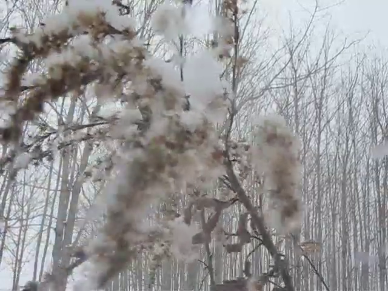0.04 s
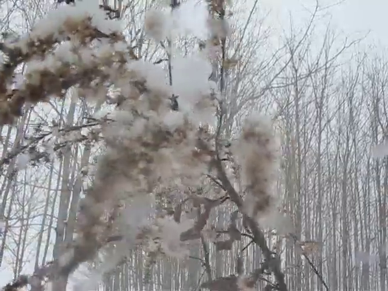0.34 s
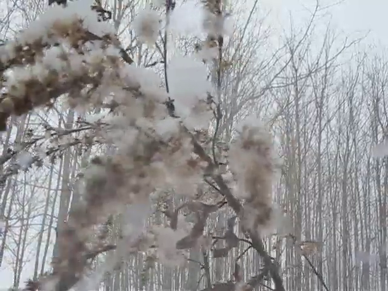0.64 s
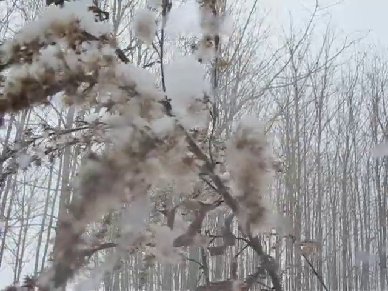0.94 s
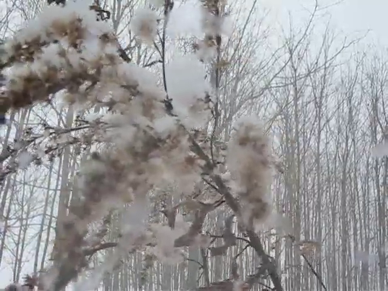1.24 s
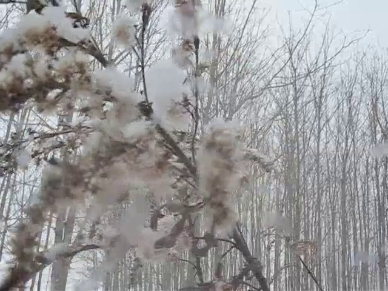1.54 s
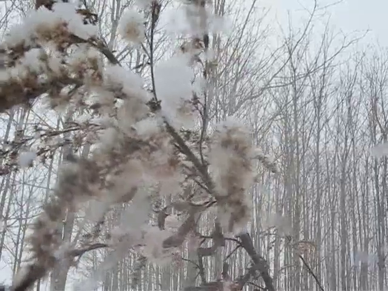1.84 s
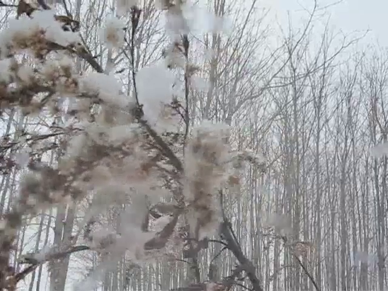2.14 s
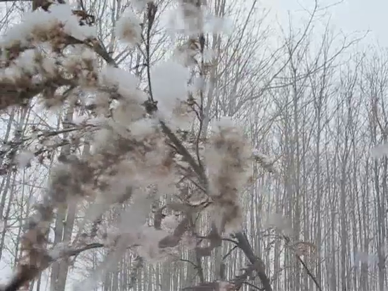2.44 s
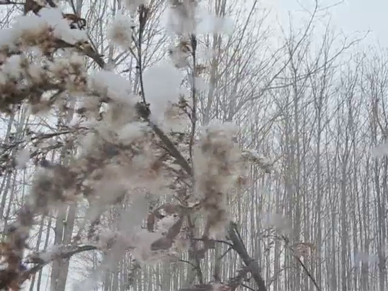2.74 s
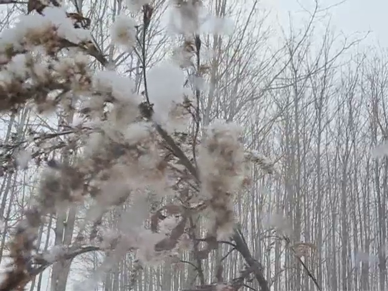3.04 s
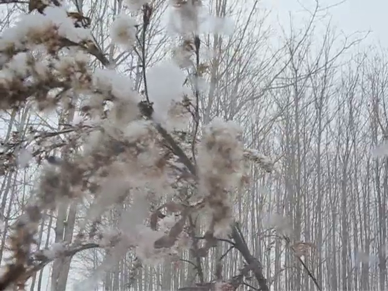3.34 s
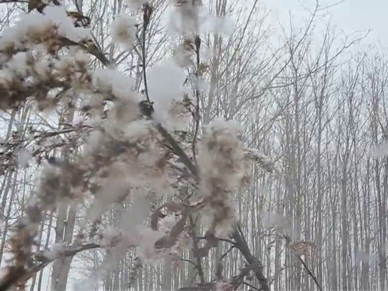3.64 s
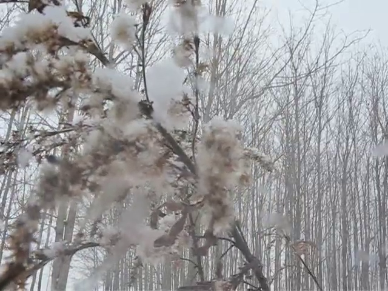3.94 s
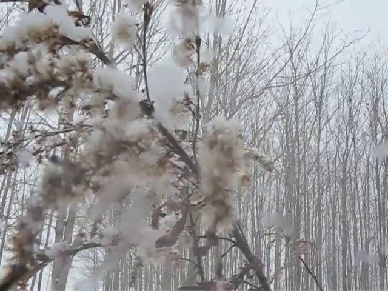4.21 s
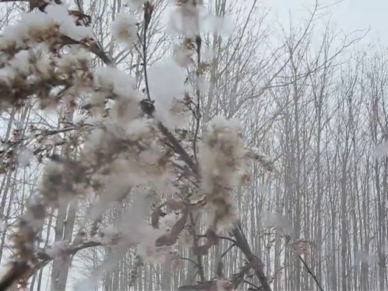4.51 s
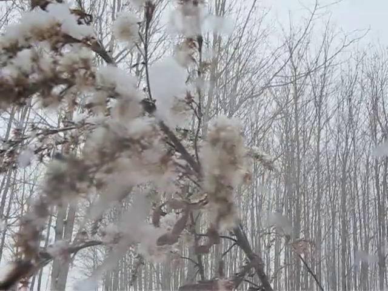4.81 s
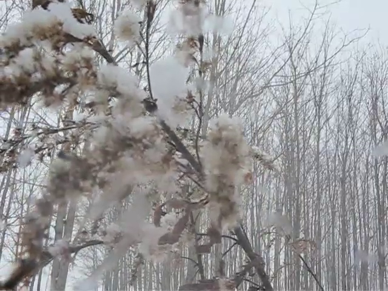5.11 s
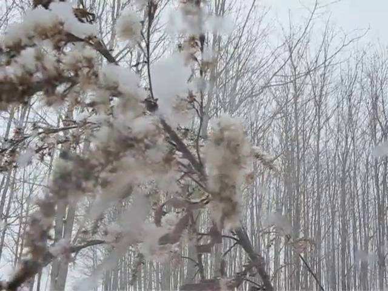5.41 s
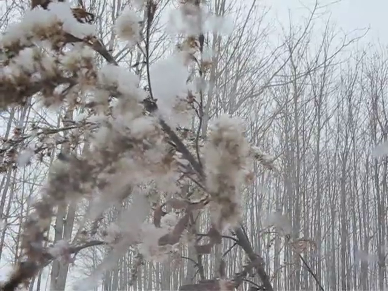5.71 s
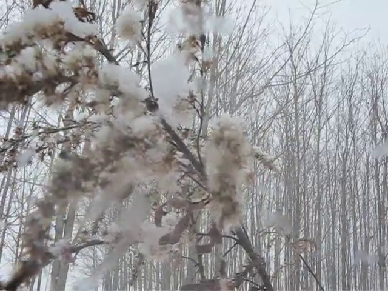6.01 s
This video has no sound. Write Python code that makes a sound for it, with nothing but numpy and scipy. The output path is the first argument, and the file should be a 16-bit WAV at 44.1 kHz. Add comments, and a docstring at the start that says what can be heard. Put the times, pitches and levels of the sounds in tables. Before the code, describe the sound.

Sleet patters steadily on twigs in a winter wood, with sharp little clicks, dull taps and faint air in the trees.

```python
"""Icy snow pellets fall on dry, snow-laden weeds at the edge of a bare wood.
Near pellets click on twigs among duller knocks, each blow ringing a few damped resonances;
countless far ones merge into a fine crackling hiss. Soft lumps of snow land and grains trickle down.
Air rushes softly in the trees, and one puff of wind buffets the microphone."""
import sys
import numpy as np
from scipy import signal
from scipy.fft import rfft, irfft, next_fast_len
from scipy.io import wavfile
from scipy.ndimage import map_coordinates

SR = 44100
rng = np.random.default_rng(int(sys.argv[2]) if len(sys.argv) > 2 else 0)


def generate_wav(sig):
    """Save sig (samples, or channels by samples) to the path in sys.argv[1] as 16-bit PCM at SR."""
    pcm = np.round(np.clip(np.atleast_2d(sig).T, -1, 1) * 32767).astype(np.int16)
    wavfile.write(sys.argv[1], SR, pcm)


N = 271656
TICK_SAMPLES, TICK_S, TICK_HZ = 512, .003, 8610  # one blow: buffer, nominal length, typical pitch
LEAD_IN_S = .002  # a faint lead-in softens each click's attack

# tone colour of the pellets' patter: (frequency [Hz], level [dB])
PATTER = [(1470, -33), (2500, -9), (3110, -7.5), (3630, -7), (4110, -4.5), (5150, -5.5), (7250, -1.5),
          (7890, 0.5), (8870, 3.5), (10900, -9.5), (15200, -25), (16000, -27)]


def amp(db):
    """Decibels to gain."""
    return 10 ** (np.asarray(db) / 20)


def unit(x):
    """Each row at rms 1."""
    return x / np.sqrt(np.mean(x ** 2, axis=-1, keepdims=True) + 1e-20)


def wobble(rate):
    """A smooth random curve, rate knots a second."""
    return map_coordinates(rng.standard_normal(int(N * rate / SR) + 4), [np.arange(N) * rate / SR])


def filtered(x, response):
    """x through a frequency response."""
    size = next_fast_len(N + 8192)
    return irfft(rfft(x, size) * response(np.fft.rfftfreq(size, 1 / SR)), size)[:N]


def coloured(x, spectrum):
    """x through an EQ curve of (frequency [Hz], level [dB]) points on a log axis."""
    points_hz, db = np.transpose(spectrum)
    return filtered(x, lambda hz: amp(np.interp(np.log(hz + 1), np.log(points_hz + 1), db)))


def placed(times, sounds):
    """Short sounds, one a row, summed at their start times."""
    at = np.round(np.maximum(times, 0) * SR).astype(int)[:, None] + np.arange(sounds.shape[1])
    return np.bincount(at.ravel(), sounds.ravel(), N)[:N]


def trees(level_db):
    """The even rush of air in the wood."""
    # tone colour of the air: (frequency [Hz], level [dB])
    rush = [(20, -9), (45, -1.5), (70, -1), (100, -1.5), (135, -1.5), (180, -1), (350, -0.5), (700, -0.5),
            (1500, -2), (3000, -6), (5000, -10), (9000, -7), (15000, -23)]
    return unit(coloured(rng.standard_normal(N), rush)) * amp(level_db + 0.45 * wobble(4.69))


def puff(level_db, swell_db, eddy_db, middle_s=0.88, half_width_s=0.49, eddy_s=.02):
    """Passing wind rumbles on the microphone; each eddy swells the rumble and swings the pressure once."""
    # tone colour of the rumble: (frequency [Hz], level [dB])
    buffet = [(15, -5), (35, 3.5), (75, -2.5), (140, -8), (220, -15.5), (400, -29), (1000, -58),
              (3000, -120)]
    # eddies in the puff: (time [s], level [dB], pitch [Hz])
    eddies = [(.37, -48, 50), (.499, -43, 70), (.536, -38, 72), (.685, -36.5, 105), (.708, -37.5, 189),
              (0.785, -37.5, 85), (.803, -32.5, 150), (.832, -38, 330), (1.085, -49, 80), (1.16, -40, 129),
              (1.217, -42.5, 70)]
    times, db, hz = np.transpose(eddies)
    t = np.arange(N) / SR
    passing = amp(level_db) * np.exp(-((t - middle_s) / half_width_s) ** 2)
    swells = amp(db + swell_db) @ np.exp(-((t - times[:, None]) / eddy_s) ** 2)
    rumble = unit(coloured(rng.standard_normal(N), buffet)) * (passing + swells)
    half = SR // 20
    cycles = hz[:, None] * np.arange(-half, half) / SR
    swing = np.cos(2 * np.pi * (cycles + rng.random((len(times), 1)))) * np.exp(-cycles ** 2 / 0.52)
    return rumble + placed(times - half / SR, amp(db + eddy_db)[:, None] * swing)


def crackle(spread_db, count, decay_s=0.00019):
    """Tiny damped rings of random pitch at random times, at rms 1."""
    when, pitch, size = rng.random((count, 3)).T
    t = np.arange(64) / SR
    hz = 2000 + 13000 * pitch
    rings = np.sin(2 * np.pi * hz[:, None] * t) * np.exp(-t / decay_s)
    grains = amp(spread_db * size ** 3)[:, None] * rings
    return unit(coloured(placed(when * N / SR, grains), PATTER))


def far_pellets(hiss_db, grain_db):
    """Distant impacts: a dense crackle over the hiss that the farthest merge into."""
    # strength of the fall: (time [s], level [dB])
    shower = [(0, -50.5), (.41, -51.5), (.68, -49), (1.23, -46.5), (2.93, -51.5), (3.31, -47.5),
              (4.4, -49.5), (6.16, -49)]
    grains = amp(grain_db) * crackle(spread_db=24.5, count=9000)
    hiss = amp(hiss_db) * unit(coloured(rng.standard_normal(N), PATTER))
    fall_db = np.interp(np.arange(N) / SR, *np.transpose(shower))
    return (grains + hiss) * amp(fall_db + 0.91 * wobble(12))


def trickle(level_db, rise_s=.005, fall_s=0.011):
    """Loose grains rattle down through the weeds; each spill starts fast and dies away."""
    # pinches of snow breaking up: (time [s], level [dB])
    spills = [(4.535, -38.5), (4.582, -37), (4.62, -52), (4.655, -48), (4.715, -41)]
    times, db = np.transpose(spills)
    age = np.arange(N) / SR - times[:, None]
    flow = amp(db + level_db) @ np.exp(-np.abs(age / np.where(age < 0, rise_s, fall_s)))
    return crackle(spread_db=6, count=7000) * flow


def lumps(level_db):
    """A soft landing pushes the air once and does not ring; the snow cushions its edge."""
    # lumps of snow landing: (time [s], level [dB], contact time [s])
    landings = [(0.2227, -36, 0.00092), (0.3844, -27, 0.00023), (1.1502, -21.5, 0.0002),
                (4.308, -33, 0.00036), (4.6149, -16, 0.00043), (4.6428, -30.5, 0.0004),
                (4.6807, -31, 0.00043), (5.1452, -29.5, 0.00041)]
    times, db, contact_s = np.transpose(landings)
    age = np.arange(TICK_SAMPLES) / SR / contact_s[:, None]  # in contact times
    push = 2 * np.pi * age * (1 - age + age ** 2 / 6) * np.exp(-age)
    return coloured(placed(times, amp(db + level_db)[:, None] * push), [(2500, -1.5), (6000, -12)])


def thicket(x, wet_db, t60):
    """Stems and ground scatter a short, faint tail after each tick."""
    t = np.arange(SR // 8) / SR
    tail = rng.standard_normal(len(t)) * amp(-60 * t / t60)
    return x + amp(wet_db) * signal.fftconvolve(x, tail / np.linalg.norm(tail))[:N]


def contacts(rattle_s, rebound, lead_in, count=5):
    """Spectra of blows: after a faint lead-in, a pellet lands, then chips and rebounds a few times."""
    hz = np.fft.rfftfreq(TICK_SAMPLES, 1 / SR)
    impulse = lambda when: np.exp(-2j * np.pi * when[..., None] * hz)
    chance = rng.random((len(rattle_s), 2, count))
    strength = rng.standard_normal(chance.shape + (1,))
    before = LEAD_IN_S * np.sqrt(chance[:, 0])
    after = LEAD_IN_S + (np.arange(count) + chance[:, 1]) / count * rattle_s[:, None]
    soft_attack = lead_in * strength[:, 0] * impulse(before)
    rebounds = rebound * strength[:, 1] * impulse(after)
    return impulse(np.array(LEAD_IN_S)) + np.sum(soft_attack + rebounds, axis=1)


def ring(blows, pitch, modes, detune, focus):
    """Blows through a few resonances, a little different at each spot; rms 1 over a tick's length."""
    hz = np.fft.rfftfreq(TICK_SAMPLES, 1 / SR)
    peak = lambda centre, q: 1j * hz * centre / q / (centre ** 2 - hz ** 2 + 1j * hz * centre / q)
    chance = rng.standard_normal((len(pitch), len(modes), 2))
    body = 0
    for k, (ratio, q, db) in enumerate(modes):
        centre = pitch[:, None] * ratio * np.exp(detune * chance[:, k, :1])
        body = body + (-1) ** k * amp(db + 2 * chance[:, k, 1:]) * peak(centre, q)
    # a broad second resonance rounds the attack and darkens the skirts
    rounded = irfft(blows * body * peak(pitch[:, None], focus))
    return unit(rounded) * np.sqrt(TICK_S * SR / TICK_SAMPLES)


def strikes(times, tick_db, tick_hz, ping_db, ping_hz, knock_db, knock_hz, snap_db, rattle,
            snap_hz=12300, rattle_stretch=1.128):
    """Each blow sounds a bright tick, a lower ping, a dull knock and a fine snap."""
    # resonances of each part: (pitch ratio, quality factor, level [dB])
    husk = [(.93, 4.76, -3), (1.04, 7.5, 1)]  # the icy husk ticks
    twig = [(.8, 6, -8.5), (1.0, 10.8, 5.5), (1.18, 4.5, -6.5)]  # the twig pings
    stalk = [(0.46, 1.8, -6), (.95, 5.4, 2.5), (1.5, 2.1, -4), (2.8, 1.5, -11.5)]  # the leaf or stalk gives with a knock
    ice = [(1.0, 3, -4), (1.15, 9.9, -4)]  # the pellet itself snaps
    blows = contacts(rattle_stretch * rattle, rebound=0.66, lead_in=0.37)
    tick = amp(tick_db)[:, None] * ring(blows, tick_hz, husk, detune=0.019, focus=1.5)
    ping = amp(ping_db)[:, None] * ring(blows, ping_hz, twig, detune=0.024, focus=0.67)
    knock = amp(knock_db)[:, None] * ring(blows, knock_hz, stalk, detune=0.037, focus=0.32)
    snap = amp(snap_db)[:, None] * ring(blows, np.full(len(times), snap_hz), ice, detune=0.014, focus=1.2)
    return placed(times - LEAD_IN_S, tick + ping + knock + snap)


def small_pellets(level_db, range_db, rarity, count=480):
    """Lighter pellets land at random on the weeds around; most are faint."""
    when, rattle = rng.random((count, 2)).T
    spot = rng.standard_normal((count, 6)).T
    db = level_db + range_db * np.linspace(0, 1, count) ** rarity
    return strikes(when * N / SR, tick_db=db, tick_hz=8600 * np.exp(0.062 * spot[0]),
                   ping_db=db - 7 + 3 * spot[1], ping_hz=5300 * np.exp(0.21 * spot[2]),
                   knock_db=db - 7.5 + 3 * spot[3], knock_hz=2200 * np.exp(0.43 * spot[4]),
                   snap_db=db - 18 + 3 * spot[5], rattle=0.000732 * rattle)


def dull_knocks():
    """Duller blows in the weeds: a knock with a lighter tick on top."""
    # dull knocks: (time [s], knock level [dB], knock pitch [Hz])
    # the four rows near 4.615 s form one loud, broad knock
    knocks = [(1.15, -36, 1900), (1.6754, -42, 1400), (1.8509, -42, 1190), (2.338, -43.5, 2700),
              (2.5766, -38.5, 1890), (3.3022, -43, 3080), (3.387, -38, 2300), (3.4136, -39.5, 2400),
              (4.6149, -27.5, 630), (4.616, -24, 1920), (4.6176, -28.5, 3190), (4.6179, -29.5, 810),
              (4.6428, -31.5, 1110), (4.6807, -35.5, 1290), (4.7027, -39.5, 1090), (5.1452, -36, 1000),
              (5.1806, -40, 1500), (5.232, -40, 990), (5.241, -38, 2220), (5.5723, -33, 2000),
              (5.6513, -42, 2400), (5.6842, -42.5, 2800), (5.8947, -39, 2280), (5.9652, -43, 1800)]
    times, db, knock_hz = np.transpose(knocks)
    spot = rng.standard_normal((len(times), 2)).T
    return strikes(times, tick_db=db - 1.5, tick_hz=TICK_HZ * np.exp(0.03 * spot[0]),
                   ping_db=db - 6.5, ping_hz=4650 * np.exp(0.13 * spot[1]),
                   knock_db=db, knock_hz=knock_hz,
                   snap_db=db - 19, rattle=np.full(len(times), 0.000705))


def twig_clicks():
    """The harder the contact, the brighter the click: a higher tick, more ice snap, less twig ping."""
    # pellets on icy twigs: (time [s], tick level [dB], brightness [dB], twig pitch [Hz],
    # rattle before stretching [s])
    clicks = [(0.094, -33.5, 4.5, 6650, 0.00074), (0.4294, -33, -1.5, 6000, .0007),
              (0.607, -36.5, 4, 5400, 0.00083), (1.1852, -26.5, 8, 5070, .0008),
              (1.3762, -39, 7, 5500, 0.00064), (1.4588, -32.5, -5, 4600, 0.00075),
              (1.54, -37.5, -6, 6300, .0008), (1.6725, -39, -1, 5800, .002), (2.1074, -35, -1, 6800, .0008),
              (2.116, -36.5, 1, 5170, 0.0014), (2.6512, -21.5, 0, 5970, .0011),
              (2.839, -32, 0.5, 6800, .0008), (3.2454, -29, 6, 4140, .0013),
              (3.529, -39.5, -2, 6000, .0006), (3.7, -37, -1, 6000, 0.00052),
              (4.186, -36.5, 2, 4400, .0008), (4.586, -25.5, -1, 4130, .0007),
              (4.6014, -30, -1, 5600, .0007), (4.6166, -21.5, -8, 5760, .001),
              (4.6428, -24, -2, 6840, 0.00032), (4.6528, -21, -0.5, 6740, 0.000585),
              (4.8467, -35.5, -2.5, 6500, 0.00085), (5.1056, -22.5, 5.5, 5230, .0009),
              (5.24, -30, -9.5, 6340, 0.0045), (5.282, -35, -2, 6600, .0006),
              (5.4042, -19.5, 0, 5360, 0.0016), (5.4993, -29.5, -6, 6870, .0005),
              (5.5726, -32, -6, 6750, .0006), (5.6009, -35.5, 4, 5400, .0004),
              (5.632, -35, 4, 3900, 0.00032), (5.7171, -37, 9, 4500, 0.00057),
              (6.137, -37.5, 7, 5100, .0016)]
    times, db, bright, twig_hz, rattle = np.transpose(clicks)
    stalk_hz = 1870 * np.exp(0.26 * rng.standard_normal(len(times)))
    return strikes(times, tick_db=db, tick_hz=TICK_HZ + 55 * bright,
                   ping_db=db - 7 - bright, ping_hz=twig_hz,
                   knock_db=db - 21, knock_hz=stalk_hz,
                   snap_db=db - 21 + 2 * bright, rattle=rattle)


def scene():
    """Near ticks in the thicket, over a bed of patter and air."""
    near = twig_clicks() + dull_knocks() + lumps(level_db=-2.5)
    near += small_pellets(level_db=-54.5, range_db=14.5, rarity=4.1)
    patter = far_pellets(hiss_db=-4.5, grain_db=-4.5) + trickle(level_db=2.5)
    air = trees(level_db=-49) + puff(level_db=-54.5, swell_db=-10, eddy_db=-0.5)
    return (thicket(near, wet_db=-20, t60=0.042) + patter + air)[None]


def record(dry):
    """A brick-wall high cut at 16 kHz."""
    return filtered(dry[0], lambda hz: hz < 16000)[None]


dry = scene()
out = record(dry)
generate_wav(out)
```